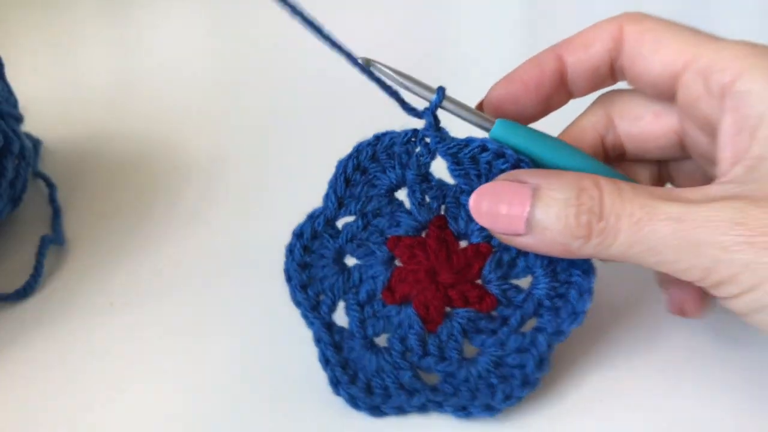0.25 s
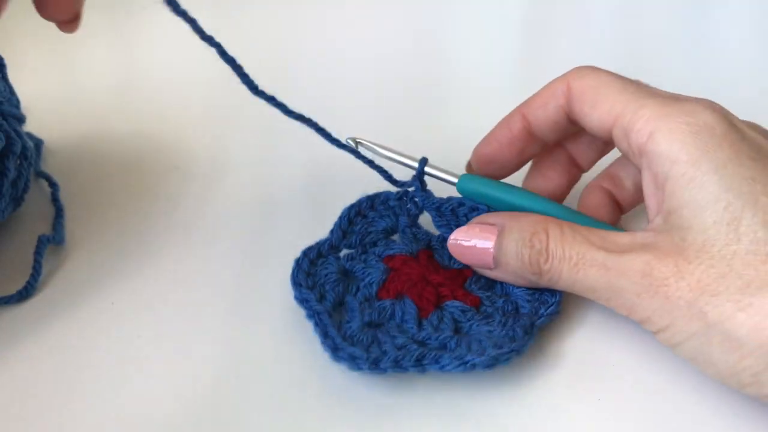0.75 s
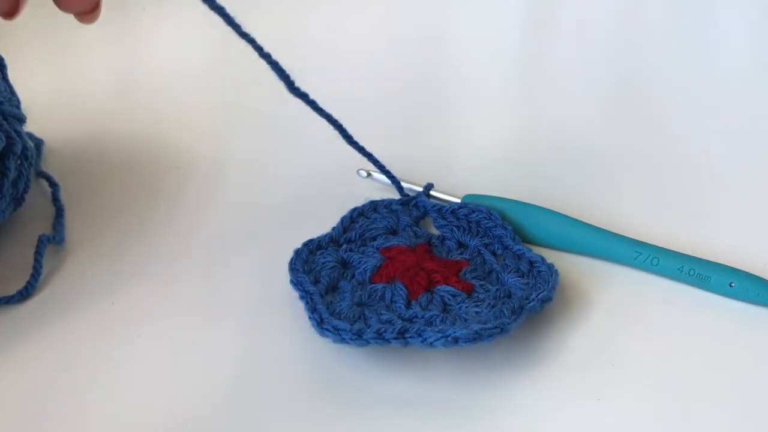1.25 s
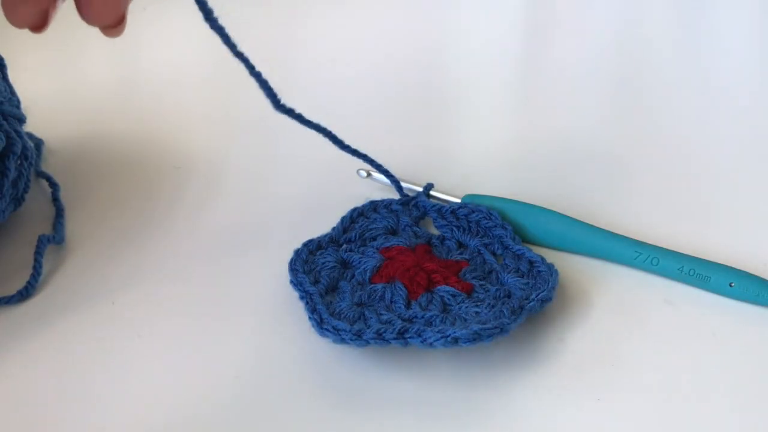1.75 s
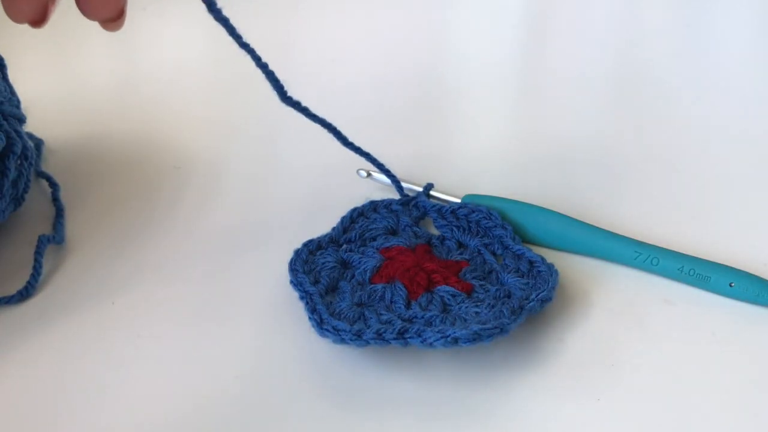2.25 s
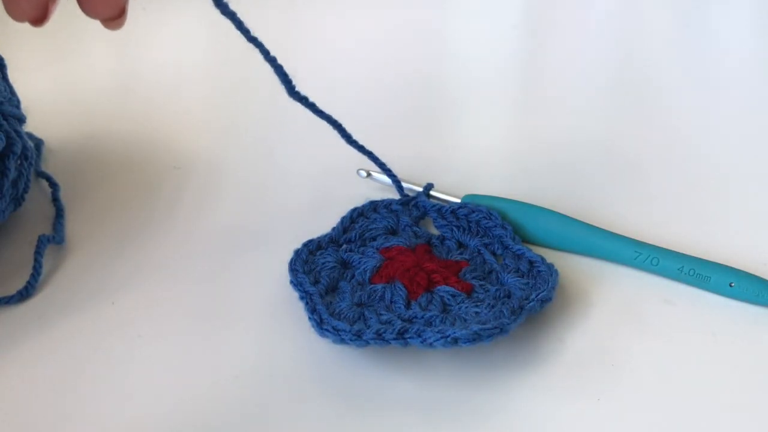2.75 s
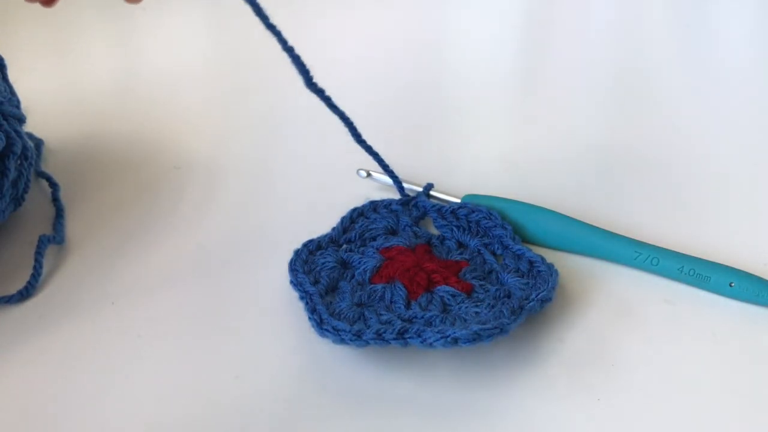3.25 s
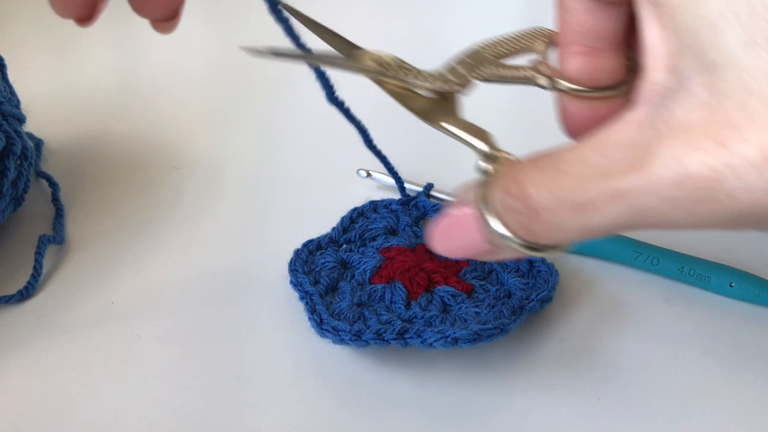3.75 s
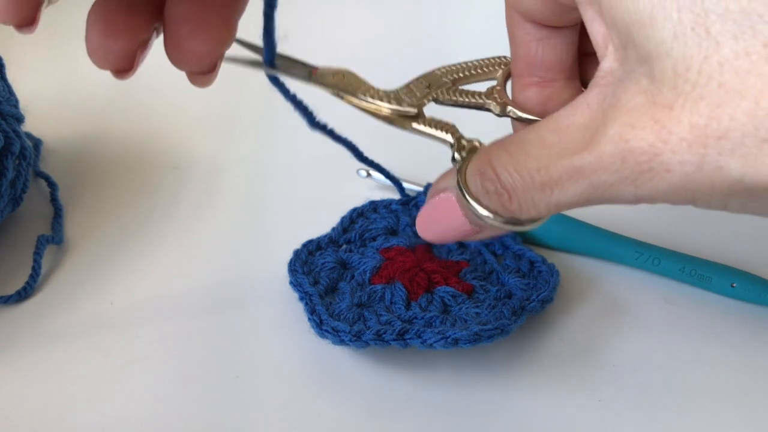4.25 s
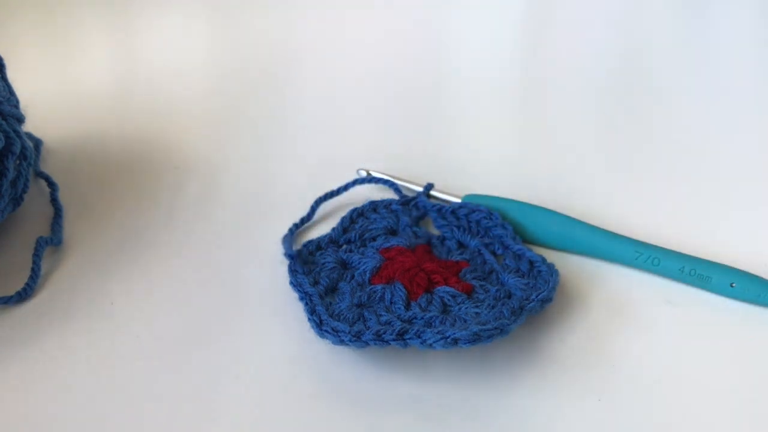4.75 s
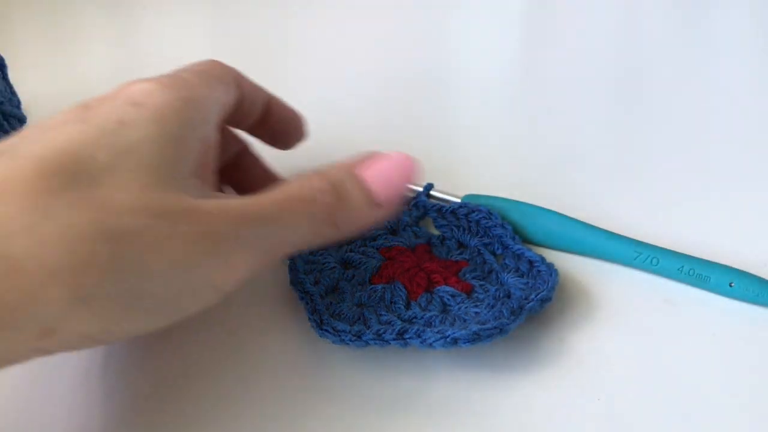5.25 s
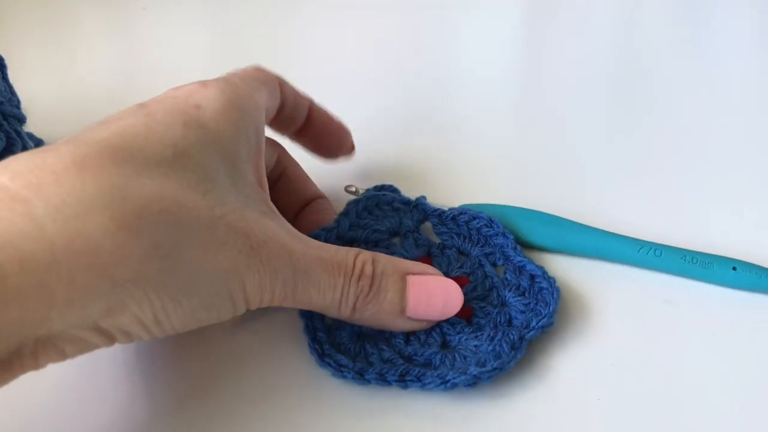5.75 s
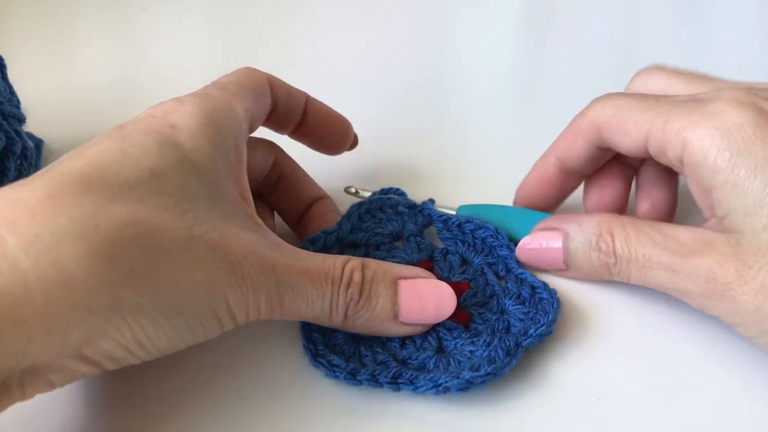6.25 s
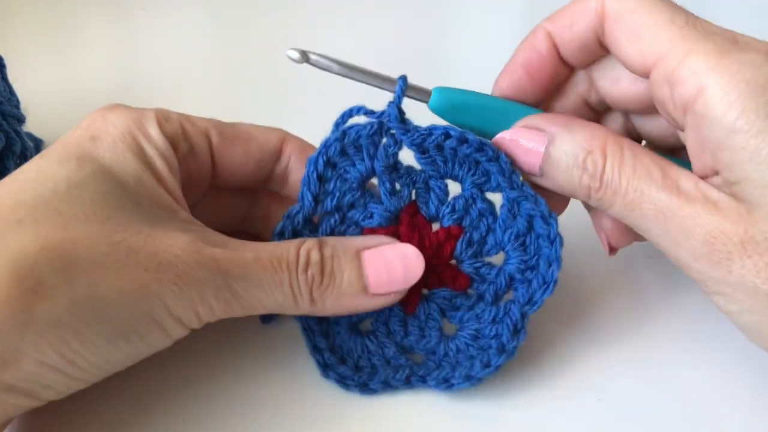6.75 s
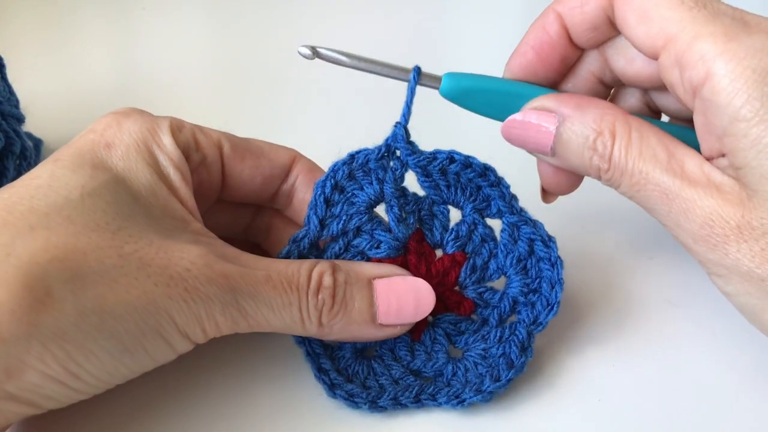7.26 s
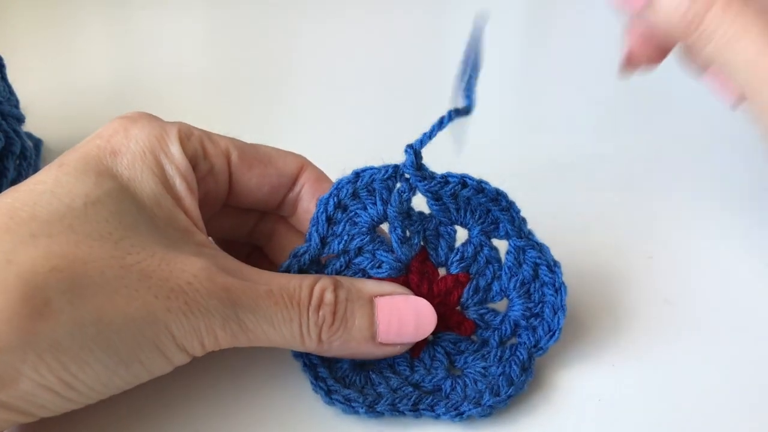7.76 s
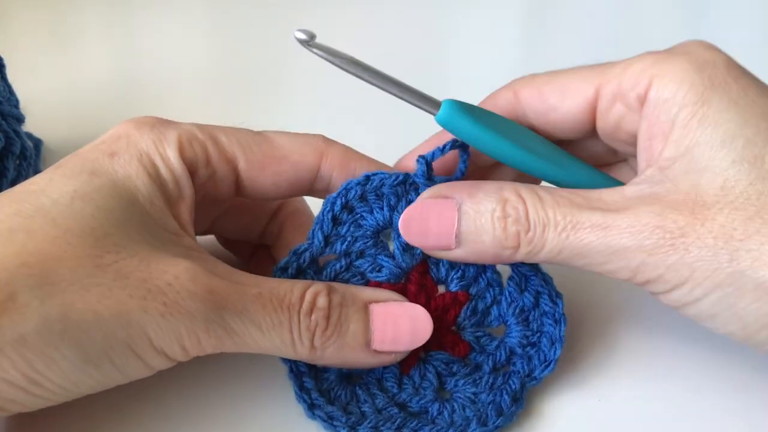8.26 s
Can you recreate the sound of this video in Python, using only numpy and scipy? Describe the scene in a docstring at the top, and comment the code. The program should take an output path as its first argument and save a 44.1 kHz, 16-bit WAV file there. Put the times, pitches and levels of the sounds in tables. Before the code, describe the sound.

Close, quiet crochet sounds: faint fibre hiss, a soft hook drop, dragged scissors, one crisp metallic snip, a hard table clatter, small final knocks.

```python
"""Crochet at a table in a quiet room, microphone close: soft pulls of yarn over room tone, hum and drone.
A hook thuds down on its handle; small steel scissors are dragged over the tabletop by stick-slip friction,
scrape as they lift, part and snip once through the yarn in short noise crunches that ring the steel.
They clatter back as damped modes of the top, skidding in three slips before they fall flat.
Fingers knock and a nail slides to pick up the hook; the loose end hisses softly through the stitch."""
import sys
import numpy as np
from scipy import signal
from scipy.fft import rfft, irfft
from scipy.io import wavfile
from scipy.ndimage import uniform_filter1d

SR = 44100
rng = np.random.default_rng(int(sys.argv[2]) if len(sys.argv) > 2 else 0)


def wrap_up_sound(samples):
    """Save the sound to the file named by the first command line argument, as 16-bit audio."""
    columns = np.atleast_2d(samples).T
    # keep every value between -1 and 1, then stretch to whole-number steps
    tamed = np.clip(columns, -1, 1)
    steps = np.round(tamed * 32767).astype(np.int16)
    wavfile.write(sys.argv[1], SR, steps)


N = 374805
TIME = np.arange(N) / SR
RING_TIME = np.arange(SR // 4) / SR

# Crowded higher bending waves of the tabletop. Each row: frequency in Hz, level in dB.
BENDING_WAVES = [(60, -17), (300, 5), (1000, -2), (2000, -2.5), (3500, 4.5), (7000, -9.5), (16000, -24)]
# Ring of the scissors on or leaving the table. Each row: frequency in Hz, width in Hz, level in dB.
SCISSORS_RING = [(4370, 140, -1.5), (5260, 190, -0.5), (7360, 120, -17), (8400, 130, -5.5),
                 (10040, 210, -3), (11400, 130, -1.5), (12100, 130, -7), (13000, 130, -1), (15200, 130, -8)]
# Pushes that drag the scissors. Each row: start in seconds, length in seconds, rise in seconds, friction
# in dB, boom of the top in dB and grit in dB (boom and grit before their trims), main resonance in Hz.
SCISSOR_PUSHES = [(2.052, 0.086, 0.0043, -52, -69, -54, 1310),
                  (2.108, 0.044, 0.016, -49.5, -77, -54.5, 1430),
                  (2.168, 0.034, 0.022, -54.5, -62, -67, 1420),
                  (2.335, 0.18, .11, -44.5, -47.5, -51.5, 1300),
                  (2.552, .105, .06, -44.5, -45, -50.5, 1070), (2.707, .1, 0.048, -50, -61, -61, 1050),
                  (2.804, .1, 0.024, -50, -59.5, -72, 885), (2.913, 0.058, 0.018, -60.5, -52.5, -82, 620),
                  (3.016, 0.034, .016, -46, -55, -60, 1360)]


def amp(db):
    """Decibels to gain."""
    return 10 ** (np.asarray(db) / 20)


def unit(x):
    """Scales to rms 1."""
    return x / np.sqrt(np.mean(x ** 2) + 1e-20)


def crest(x):
    """Scales the loudest 3 ms to rms 1."""
    loudest = uniform_filter1d(x ** 2, size=132, mode="constant").max()
    return x / np.sqrt(loudest + 1e-20)


def decay(t, t60):
    """Exponential fall by 60 dB in t60 seconds."""
    return np.exp(-np.log(1000) * t / t60)


def read(points, hz):
    """Reads a spectrum on a log-frequency axis."""
    f, value = np.transpose(points)
    return np.interp(np.log(hz + 1), np.log(f + 1), value)


def add(mix, s, sound):
    """Mixes a sound in at s seconds."""
    part = mix[round(s * SR):][:len(sound)]
    part += sound[:len(part)]


def colour(x, spectrum, size=8192):
    """Causal minimum-phase filter with the given spectrum."""
    log_gain = np.log(amp(read(spectrum, abs(np.fft.fftfreq(size, 1 / SR)))))
    response = np.exp(np.conj(signal.hilbert(log_gain)))
    taps = np.fft.ifft(response).real[:size // 2]
    return signal.oaconvolve(x, taps)[:len(x)]


def band(x, low_hz, high_hz, order=2):
    """High-pass, then low-pass."""
    for hz, kind in ((low_hz, "high"), (high_hz, "low")):
        x = signal.sosfilt(signal.butter(order, min(hz, SR / 2 - 100), kind, fs=SR, output="sos"), x)
    return x


def resonate(x, modes):
    """Parallel resonances given as (Hz, width in Hz, dB)."""
    return sum(amp(db) * signal.lfilter(*signal.iirpeak(hz, hz / width, SR), x) for hz, width, db in modes)


def glide(x, hz, width_hz):
    """A resonance that follows the curve hz: shift down to zero, smooth, shift back up."""
    turn = np.exp(2j * np.pi * np.cumsum(hz) / SR)
    r = np.exp(-np.pi * width_hz / SR)
    return (turn * signal.lfilter([(1 - r) ** 2], [1, -2 * r, r * r], x / turn)).real


def ring(modes):
    """Damped modes (Hz, dB, t60 in s); the spot that is struck randomly favours some of them."""
    hz, db, t60 = np.transpose(modes)[:, :, None]
    place = amp(rng.standard_normal(hz.shape)) * rng.choice([-1, 1], hz.shape)
    waves = np.sin(2 * np.pi * hz * RING_TIME)
    return (place * amp(db) * decay(RING_TIME, t60) * waves).sum(axis=0)


def burst(t60):
    """Noise that dies away."""
    return rng.standard_normal(len(RING_TIME)) * decay(RING_TIME, t60)


def wander(per_s, count=4000):
    """Slow chance of rms 1 that changes about per_s times a second."""
    t = np.linspace(0, TIME[-1], count)
    smoothing = np.exp(-(np.fft.rfftfreq(count, t[1]) / per_s) ** 2)
    slow = irfft(rfft(rng.standard_normal(count)) * smoothing, count)
    return np.interp(TIME, t, unit(slow))


def slips(per_s, spread_db):
    """Friction: tiny stick-slip impulses at random times, a few of them large."""
    chance = rng.random(N)
    size = np.minimum(rng.exponential(1, N), 4)
    at = np.flatnonzero(chance < per_s / SR)
    out = np.zeros(N)
    out[at] = amp(spread_db * size[at]) * (-1) ** at
    return unit(out)


def stroke(start, length, rise_s, t60):
    """Gain over time of one sliding contact: it builds up, holds for its length and dies away."""
    out = np.zeros(N)
    t = np.arange(0, length + 1.5 * t60, 1 / SR)
    attack = np.sin(np.pi / 2 * np.minimum(t / rise_s, 1)) ** 2
    add(out, start, attack * decay(np.maximum(t - length, 0), t60))
    return out


def pushed(levels_db, t60):
    """Gain over time of all pushes, each at its own level; overlaps add in power."""
    power = sum((amp(db) * stroke(*push[:3], t60)) ** 2 for push, db in zip(SCISSOR_PUSHES, levels_db))
    return np.sqrt(power)


def background():
    """Coloured noise of the room, a deep wavering hum, a wandering drone and a lingering hiss."""
    # Room tone. Each row: frequency in Hz, relative level in dB.
    air_colour = [(20, -19.5), (35, -9), (50, -7.5), (70, -4.5), (105, -3.5), (140, -10.5), (290, -13),
                  (400, -20.5), (600, -22.5), (1100, -27), (2000, -33.5), (5000, -38), (10500, -41.5),
                  (15500, -37.5)]
    # Faint drone. Each row: time in seconds, pitch in Hz before a small random waver, level in dB.
    drone_path = [(0, 140, -64), (.65, 131, -71.5), (1.05, 171, -75), (3.7, 190, -78), (6.5, 204, -75),
                  (7.05, 173, -72.5), (7.4, 155, -77.5), (8.5, 150, -80.5)]
    # Even hiss after the sharpest sounds. Each row: start in seconds, end in seconds, level in dB.
    hiss_spans = [(4.396, 4.815, -68.5), (5.38, 5.53, -69), (5.723, 6.126, -68.5)]
    # Colour of that hiss. Each row: frequency in Hz, relative level in dB.
    hiss_spectrum = [(200, 8), (1000, 4), (3000, 2.5), (8000, -1), (16000, -4.5)]
    air = amp(-65.5) * unit(colour(rng.standard_normal(N), air_colour))
    hum_hz, hum_db = 38, -70
    hum = amp(hum_db) * unit(np.sin(2 * np.pi * hum_hz * TIME + 0.15 * wander(per_s=3.6)))
    s, hz, db = np.transpose(drone_path)
    turns = np.cumsum(np.interp(TIME, s, hz)) / SR
    drone_wave = unit(np.sin(2 * np.pi * turns + 0.5 * wander(per_s=10)))
    drone = drone_wave * amp(np.interp(TIME, s, db))
    held = sum(amp(db) * ((TIME > a) & (TIME < b)) for a, b, db in hiss_spans)
    held = uniform_filter1d(held, size=800)  # softens the edges
    hiss = held * unit(colour(rng.standard_normal(N), hiss_spectrum))
    return air + hum + drone + hiss


def yarn(rub_trim_db=-3, rub_width_hz=1100, rub_shift=0.11, snag_db=1.7):
    """Countless fibres catch and let go; a duller rub of shifting pitch joins. Both follow the pull's speed."""
    # Pulls over fingers and hook. Each row: start in seconds, length in seconds, fibre hiss in dB,
    # lowest hiss frequency in Hz (higher is thinner), rub in dB before its trim, middle rub pitch in Hz.
    yarn_pulls = [(0.253, 0.14, -70.5, 6000, -92, 1500), (0.472, .24, -70, 5000, -90, 1500),
                  (0.674, 0.077, -64.5, 1500, -64, 1740), (1.546, .11, -72.5, 1500, -69.5, 1400),
                  (1.634, .14, -66.5, 1000, -68.5, 1810), (1.871, 0.14, -66.5, 1500, -68.5, 1280),
                  (1.917, 0.075, -60, 2000, -77, 1500), (1.98, 0.12, -63.5, 500, -68, 1490),
                  (5.214, 0.21, -69, 300, -72, 1490), (6.2, 0.1, -66.5, 2500, -76, 1500),
                  (6.336, 0.11, -73.5, 1000, -75, 1600), (6.467, 0.3, -71.5, 1000, -74, 1780),
                  (6.741, 0.071, -68.5, 2500, -77.5, 1500), (7.375, 0.12, -66.5, 500, -67, 1450),
                  (7.641, 0.15, -73.5, 1500, -78.5, 1200), (7.929, .11, -74.5, 2500, -90, 1490)]
    # Colour of the fibre hiss. Each row: frequency in Hz, level in dB.
    fibre_colour = [(400, -11), (1600, -3.5), (3000, 1), (5000, -2), (7000, -0.5), (10000, -4),
                    (13000, -2.5), (16000, -1.5)]
    # A pull speeds up and stops in one arch: skew over 1 peaks late; roundness under 1 has a broad top.
    skew, roundness = 0.93, 0.63
    fibres = slips(per_s=15000, spread_db=4.0) * amp(snag_db * wander(per_s=70))
    hiss = colour(fibres, fibre_colour)
    shift = 1 + rub_shift * wander(per_s=12)
    out = np.zeros(N)
    for start, length, fibre_db, lowest_hz, rub_db, rub_hz in yarn_pulls:
        during = (TIME > start) & (TIME < start + length)
        progress = (TIME[during] - start) / length
        speed = abs(np.sin(np.pi * progress ** skew)) ** roundness
        fine = amp(fibre_db) * unit(band(hiss[during], lowest_hz, SR / 2))
        rub = unit(glide(fibres[during], rub_hz * shift[during], rub_width_hz))
        add(out, start, speed * (fine + amp(rub_trim_db + rub_db) * rub))
    return out


def knocks(bending_db=-2, bending_t60=0.041, tick_t60=0.0065, rattle_db=-19, rattle_t60=0.035):
    """Each blow rings the tabletop, within its own band and with its own contact tick."""
    # Blows by the hook, fingers and scissors. Each row: time in seconds, thud in dB, lowest Hz and highest Hz #
    # of the blow, contact tick in dB.
    blows = [(0.3873, -48, 402, 2530, -65.5), (.398, -47, 60.3, 229, -85), (0.4314, -54.5, 150, 2400, -71),
             (0.451, -63.5, 90, 1500, -81), (1.751, -50, 790, 1630, -73), (1.944, -49.5, 686, 960, -78),
             (2.2581, -42.5, 990, 1890, -51.5), (2.263, -36.5, 386, 1760, -63),
             (2.966, -48.5, 248, 700, -74), (2.997, -39.5, 950, 2160, -51), (3.002, -42.5, 130, 2500, -64),
             (3.13, -40, 350, 1190, -61), (5.206, -52.5, 160, 1500, -56.5),
             (5.368, -23.5, 380, 3000, -28.5), (5.3773, -33, 129.5, 1203, -34.5),
             (5.563, -50.5, 350, 3560, -54.5), (5.7, -39.5, 602.4, 2406, -59),
             (5.707, -28.5, 300, 1500, -39.5), (5.7094, -26, 200, 1790, -29),
             (5.7177, -20, 400, 2605, -26.5), (5.725, -28, 100, 801, -40), (5.781, -35, 486, 2030, -44.5),
             (5.831, -45.5, 800, 2000, -65), (6.194, -44.5, 100, 420, -59.5), (6.207, -54, 99, 302, -63),
             (6.296, -46, 101, 278, -50)]
    # Ring of the tabletop. Each row: frequency in Hz, level in dB, t60 in seconds.
    top_modes = [(66, -13, 0.4), (102, -12.5, .15), (212, -4.5, 0.11), (278, -21, .1), (354.8, -9, 0.11),
                 (411, -9, 0.17), (434.4, -15.5, 0.064), (524, -9.5, 0.039), (595, -10.5, 0.069),
                 (698, -5.5, 0.095), (770, -4, 0.032), (995, -2, 0.05), (1046, 5, 0.032),
                 (1215, 1.5, 0.025), (1344, -8.5, .04), (1550, -7.5, 0.043), (1702, -4.5, 0.021),
                 (1847, -0.5, 0.038), (1950, -1, .022), (2127, -4, 0.04), (2253, -10.5, 0.071),
                 (3340, -13, .025)]
    # Colour of the contact tick. Each row: frequency in Hz, level in dB.
    tick_colour = [(500, -22), (2000, -3.5), (4500, -1), (6400, 2.5), (8000, -5.5), (11300, -3),
                   (14000, -10), (16000, -11.5)]
    out = np.zeros(N)
    push_db, push_hz, push_t60 = -24, 70, 0.15
    push = amp(push_db) * ring([(push_hz, 0, push_t60)])  # the whole table gives a little
    for s, db, low_hz, high_hz, tick_db in blows:
        bending = unit(colour(burst(bending_t60), BENDING_WAVES, size=2048))
        top = unit(ring(top_modes)) + amp(bending_db) * bending
        thud = crest(band(top, low_hz, high_hz, order=3)) + push
        contact = burst(tick_t60) + amp(rattle_db) * burst(rattle_t60)
        tick = crest(colour(contact, tick_colour, size=1024))
        add(out, s, amp(db) * thud + amp(tick_db) * tick)
    return out


def clicks(lowest_hz=2200):
    """A short crunch of contact, ringing the steel when the blades part or snap shut."""
    # Clicks of blades, hook and fingernail. Each row: time in seconds, level in dB, contact length in
    # seconds, centre in Hz, steel share from 0 to 1.
    contacts = [(.525, -66, 0.0018, 9000, 0), (.651, -67, .001, 9000, 0), (1.86, -67, 0.0024, 5500, 0),
                (1.596, -63, 0.0013, 6000, 0.1), (3.1042, -49, .001, 11000, 0),
                (3.473, -67.5, 0.0037, 2190, 0.1), (3.527, -55, 0.0012, 14000, 0),
                (3.528, -52, 0.0036, 6000, 0), (3.533, -64, 0.0057, 5050, .05),
                (4.368, -67, 0.004, 9000, .6), (4.381, -52, 0.0045, 7500, 0.45),
                (4.386, -61, 0.0042, 8000, 0.3), (4.4081, -30.5, 0.0012, 9100, 0.86),
                (4.4103, -45, 0.004, 11100, 0.5), (4.43, -62, .005, 10000, 0.6),
                (6.2949, -37, 0.0015, 5970, 0.2), (6.494, -61.5, 0.00096, 6000, 0.46),
                (7.469, -60.5, 0.002, 6030, 0.52)]
    # Scissors held in the hand. Each row: frequency in Hz, width in Hz, level in dB.
    held_steel = [(2660, 230, -11.5), (3220, 400, -14), (5550, 440, -21), (6450, 280, -18), (9180, 270, 1),
                  (11400, 510, -8), (12840, 300, 0), (15500, 600, -13)]
    out = np.zeros(N)
    for s, db, length, centre_hz, steel in contacts:
        release = np.exp(-np.maximum(RING_TIME - length, 0) / (0.3 * length))
        press = release * np.minimum(RING_TIME / length * 3, 1)
        crunch = rng.standard_normal(len(press)) * press
        plain = band(crunch, max(lowest_hz, centre_hz / 2), centre_hz * 1.43, order=3)
        ringing = band(resonate(crunch, held_steel), lowest_hz, SR / 2)
        add(out, s, amp(db) * crest(steel * unit(ringing) + (1 - steel) * unit(plain)))
    return out


def hook(tick_t60=0.026):
    """The hook bounces on its rubber handle: soft thuds, each with a faint tick of the tip."""
    # Bounces. Each row: time in seconds, thud in dB, tick in dB.
    bounces = [(0.9222, -32.5, -56.5), (0.9435, -44, -78), (0.9523, -39.5, -69), (.969, -46, -75)]
    # Dull handle and ringing metal shank. Each row: frequency in Hz, level in dB, t60 in seconds.
    hook_modes = [(108, -6.5, 0.066), (211, 0, 0.1), (288, -0.5, 0.033), (387, -4, 0.1), (445, 2.5, 0.036),
                  (532, -3, .025), (670, -9, 0.028), (1475, -8, 0.017), (2260, -12, 0.016)]
    out = np.zeros(N)
    for s, db, tick_db in bounces:
        tick = crest(colour(burst(tick_t60), BENDING_WAVES, size=2048))
        add(out, s, amp(db) * crest(ring(hook_modes)) + amp(tick_db) * tick)
    return out


def drag(ring_t60=0.061, boom_trim_db=-1, grit_trim_db=-2, steel_db=-9, main_db=-5, main_width_hz=520):
    """Clumped slips of steel drive modes of the top and blades, which swell and fade individually."""
    # Modes of the drag. Each row: frequency in Hz, width in Hz, level in dB.
    drag_modes = [(738, 112, -0.5), (1141, 78, 4), (1425, 40, -5.5), (1620, 70, -8.5), (1930, 150, -3.5),
                  (2580, 140, -14)]
    # Boom of the top. Each row: frequency in Hz, width in Hz, level in dB.
    boom_modes = [(206, 31, -12.5), (324, 35, 1), (391, 31, 0.5)]
    # Colour of the grit. Each row: frequency in Hz, level in dB.
    grit_colour = [(1500, -14), (2600, -4), (3000, 0.5), (3800, 3.5), (5500, -3.5), (8000, -4.5),
                   (12000, -8.5), (16000, -13)]
    clump_db, travel_db, blade_swing_db = 1.0, 5.0, 5  # random swings of slips, modes and blade ring
    # after a push the scissors slide to rest; the top booms a little longer
    slide_t60, boom_t60 = 0.2, 0.42
    start, length, _, frictions, booms, grits, main_hz = np.transpose(SCISSOR_PUSHES)
    jerks = unit(slips(per_s=2500, spread_db=2.5) * amp(clump_db * wander(per_s=130)))
    grains = unit(signal.oaconvolve(jerks, burst(ring_t60))[:N])
    modes = sum(resonate(jerks, [mode]) * amp(travel_db * wander(per_s=9.9)) for mode in drag_modes)
    main = glide(jerks, np.interp(TIME, start + length / 2, main_hz), main_width_hz)
    body = unit(band(unit(modes) + amp(main_db) * unit(main), 554, 2740, order=4))
    boom = amp(boom_trim_db) * unit(band(resonate(jerks, boom_modes), 203, 453, order=3))
    fine = grains + amp(-3.5) * slips(per_s=600, spread_db=2)
    blades = sum(resonate(jerks, [mode]) * amp(blade_swing_db * wander(per_s=9)) for mode in SCISSORS_RING)
    grit = amp(grit_trim_db) * unit(colour(fine, grit_colour)) + amp(steel_db) * unit(blades)
    sliding = body * pushed(frictions, slide_t60) + grit * pushed(grits, slide_t60)
    return sliding + boom * pushed(booms, boom_t60)


def scrapes(ring_db=7):
    """Short strokes of friction on the top: scissors lifted and ringing, three skids, a fingernail."""
    # Colour of the scissors scraping as they lift. Each row: frequency in Hz, level in dB.
    lift_colour = [(88, -41), (150, -21), (315, -9), (545, -9), (905, -2.5), (1420, -13.5), (2100, -10),
                   (2980, -19), (4410, -17), (6510, -27.5), (7180, -21), (13700, -39), (16000, -40)]
    # Skids of one end before the scissors fall flat. Each row: start in seconds, rise in seconds, level in dB.
    skid_strokes = [(5.562, .003, -46), (5.608, 0.012, -50.5), (5.653, .018, -46)]
    # Colour of the skids. Each row: frequency in Hz, level in dB.
    skid_colour = [(120, -43.5), (200, -6.5), (311, -11.5), (465, 4.5), (696, -13.5), (899, -0.5),
                   (986, -23), (1180, -7.5), (1530, -26.5), (1940, -14), (2700, -5.5), (3760, -20),
                   (5200, -19), (6880, -23.5), (7970, -29), (16000, -35)]
    # Colour of the nail sliding under the hook. Each row: frequency in Hz, level in dB.
    nail_colour = [(290, -65), (500, -7.5), (1260, -12), (1770, -4), (1930, -13), (3340, -10), (4030, -14),
                   (5800, -8), (16000, -29)]
    bite_s = 0.0019  # a hard edge grips the top this quickly
    grains = unit(slips(per_s=2200, spread_db=2.5) * amp(1.5 * wander(per_s=150)))

    # the scissors scrape harder as they tip up and leave the table
    lift_s, lift_length_s, lift_db, swell_db, lift_t60 = 3.102, 0.053, -49, 9, 0.06
    tilt = np.clip((TIME - lift_s) / lift_length_s, 0, 1)
    pressure = amp(lift_db + swell_db * tilt) * stroke(lift_s, lift_length_s, bite_s, lift_t60)
    lift = unit(colour(grains, lift_colour)) * pressure
    free_ring = amp(ring_db) * resonate(grains * pressure, SCISSORS_RING)

    skid_length_s, skid_t60 = 0.023, 0.11
    skid_gain = sum(amp(db) * stroke(s, skid_length_s, rise_s, skid_t60) for s, rise_s, db in skid_strokes)
    skid = unit(colour(grains, skid_colour)) * skid_gain

    nail_s, nail_length_s, nail_db, nail_t60 = 6.294, 0.039, -50.5, 0.04
    nail_gain = amp(nail_db) * stroke(nail_s, nail_length_s, bite_s, nail_t60)
    nail = unit(colour(grains, nail_colour)) * nail_gain
    return lift + free_ring + skid + nail


def room(x, build_s=0.0033):
    """Diffuse reflections that build up quickly and die band by band."""
    # Reverberation of the room. Each row: frequency in Hz, t60 in seconds.
    room_t60 = [(150, 0.35), (400, 0.36), (1000, 0.23), (3000, 0.3), (7000, 0.22), (15000, 0.15)]
    hz, t, z = signal.stft(rng.standard_normal(len(RING_TIME)), SR, nperseg=256)
    fading = z * decay(t, read(room_t60, hz)[:, None])
    tail = signal.istft(fading, SR, nperseg=256)[1][:len(RING_TIME)]
    tail *= np.minimum(RING_TIME / build_s, 1)
    return signal.oaconvolve(x, tail / np.linalg.norm(tail))[:N]


def scene(table_wet_db=-12, hand_wet_db=-21):
    """Sounds on the table to one side are wetter than those in the hands right under the microphone."""
    hands = yarn() + clicks()
    table = knocks() + hook() + drag() + scrapes()
    reflections = room(amp(table_wet_db) * table + amp(hand_wet_db) * hands)
    return (background() + table + hands + reflections)[None]


def record(dry):
    """The recorder's band limits: a low cut against rumble and a steep treble edge."""
    rumble_cut_hz, edge_hz = 30, 15800
    cut = signal.sosfilt(signal.butter(4, rumble_cut_hz, "high", fs=SR, output="sos"), dry)
    edge = signal.firwin(201, edge_hz, window=("kaiser", 8), fs=SR)
    return signal.oaconvolve(cut, edge[None], "same")


dry = scene()
out = record(dry)
wrap_up_sound(out)
```